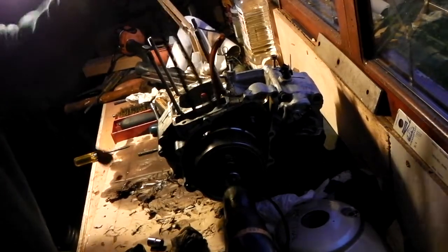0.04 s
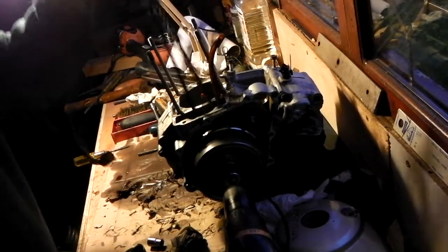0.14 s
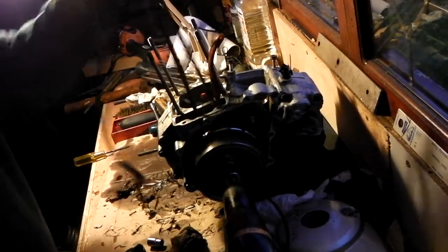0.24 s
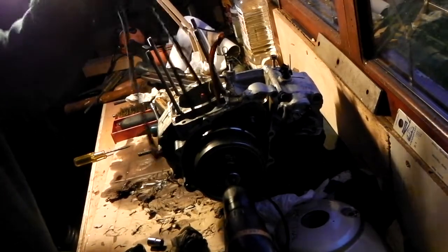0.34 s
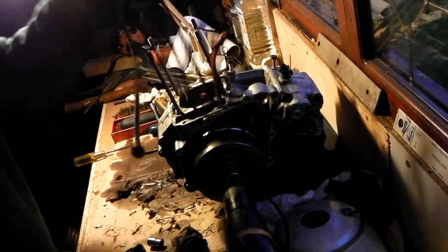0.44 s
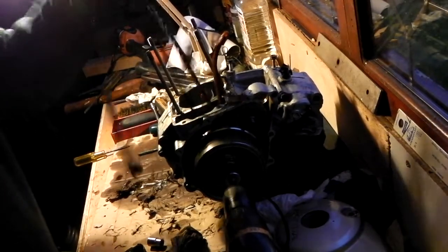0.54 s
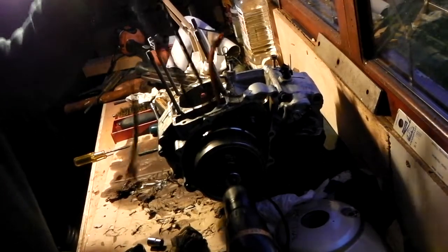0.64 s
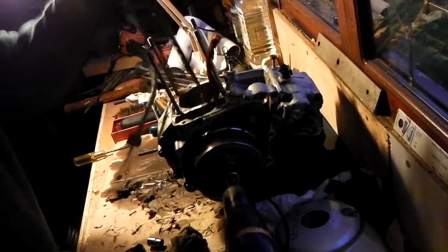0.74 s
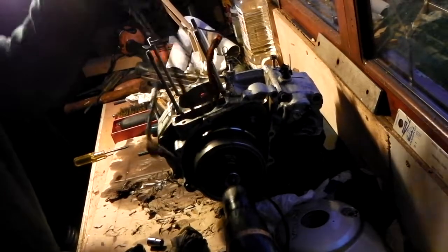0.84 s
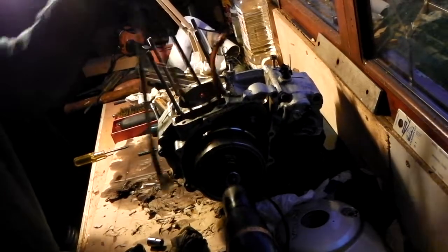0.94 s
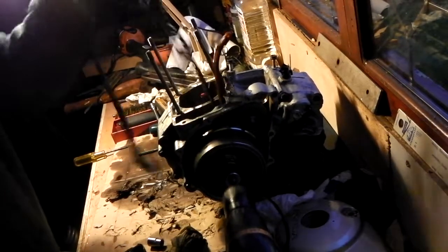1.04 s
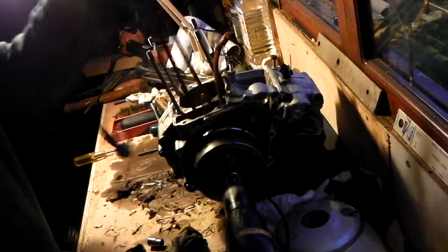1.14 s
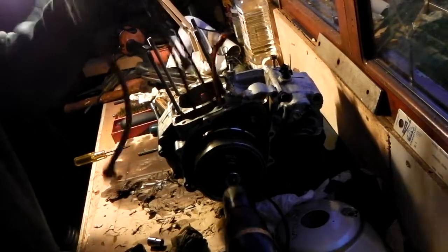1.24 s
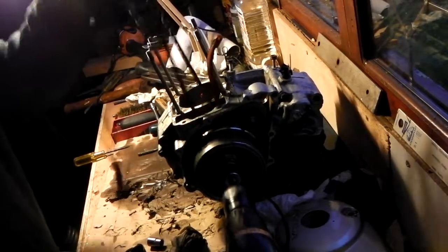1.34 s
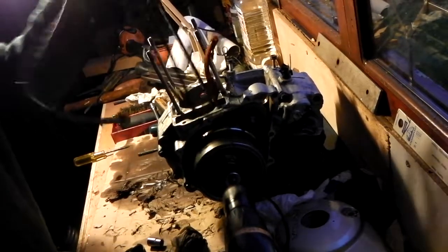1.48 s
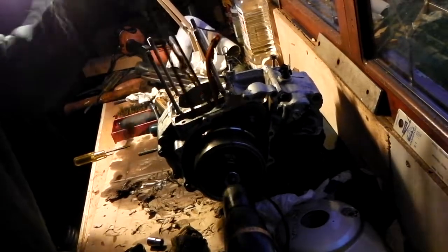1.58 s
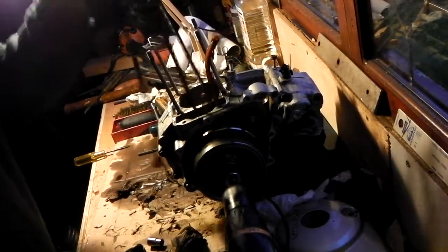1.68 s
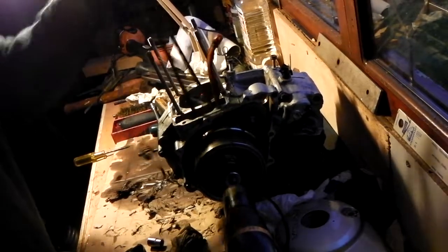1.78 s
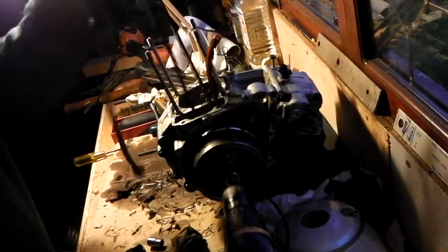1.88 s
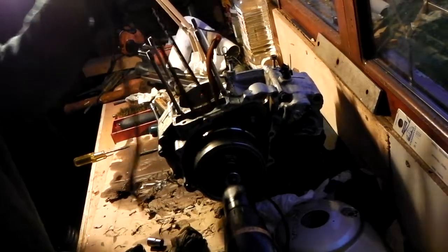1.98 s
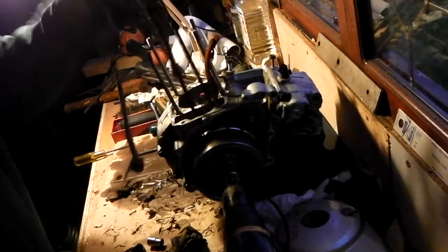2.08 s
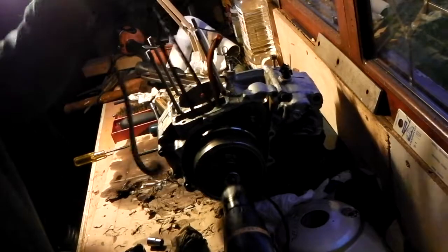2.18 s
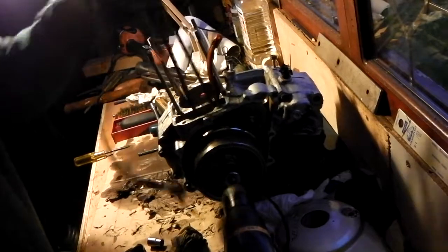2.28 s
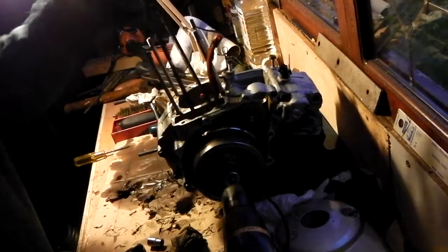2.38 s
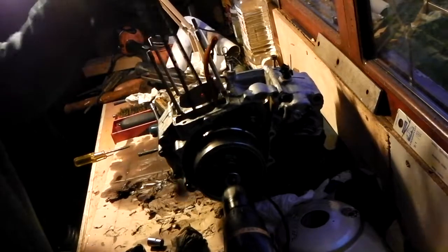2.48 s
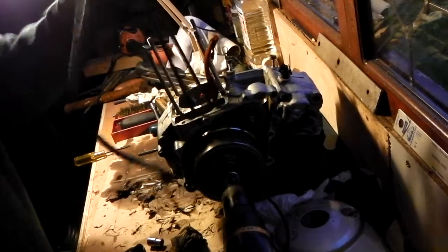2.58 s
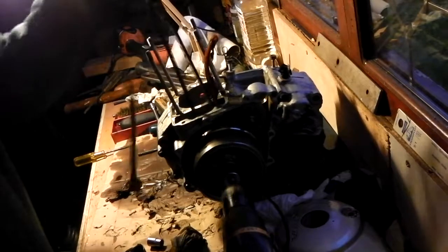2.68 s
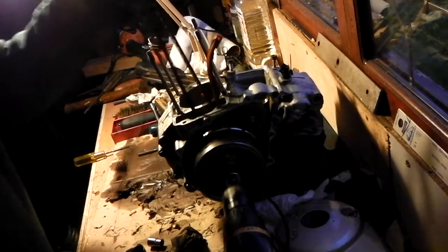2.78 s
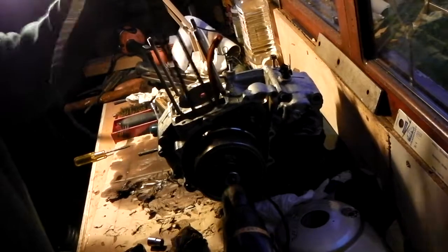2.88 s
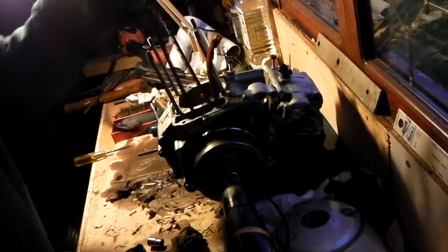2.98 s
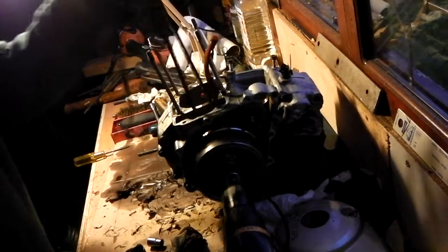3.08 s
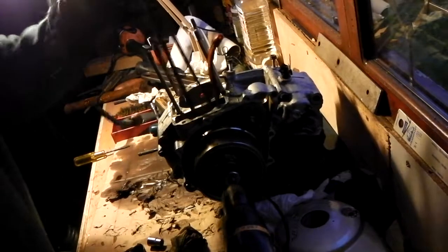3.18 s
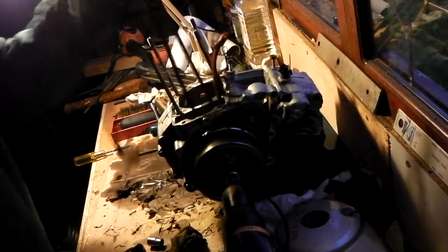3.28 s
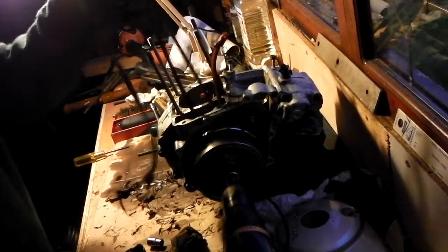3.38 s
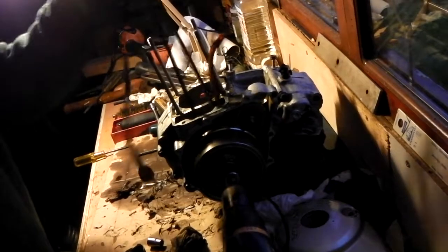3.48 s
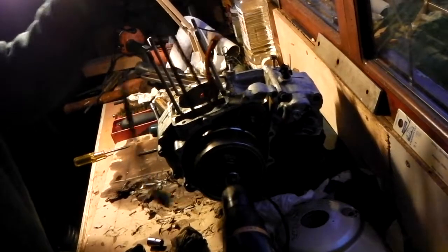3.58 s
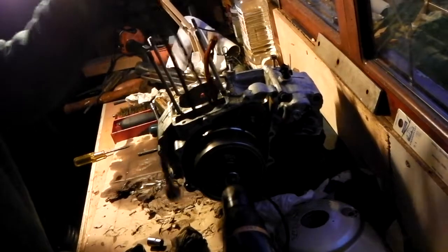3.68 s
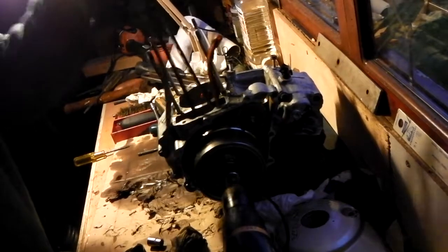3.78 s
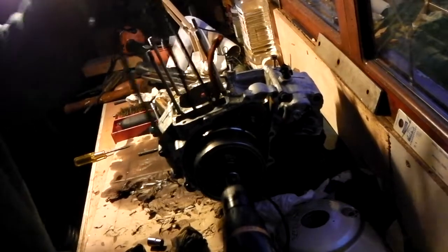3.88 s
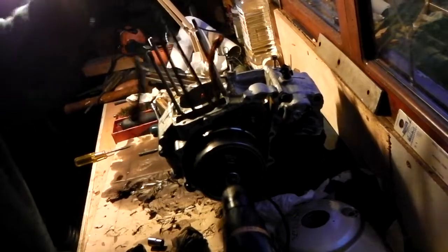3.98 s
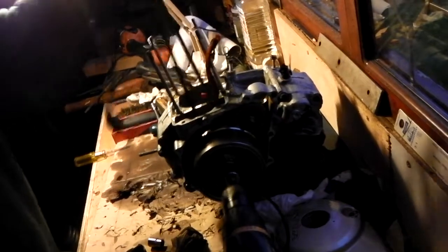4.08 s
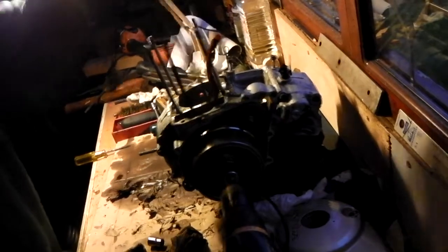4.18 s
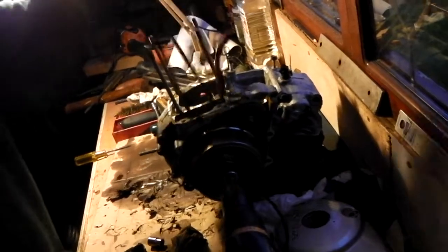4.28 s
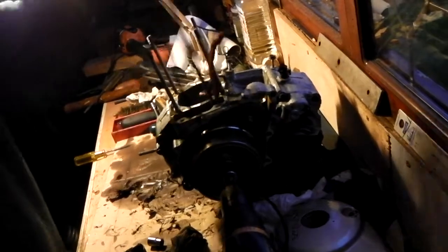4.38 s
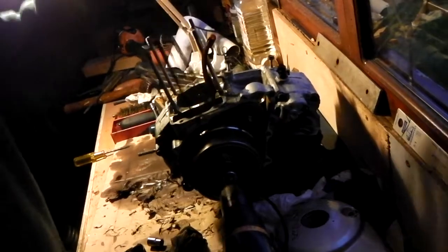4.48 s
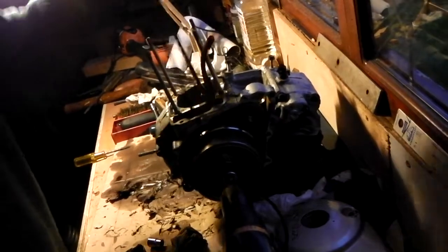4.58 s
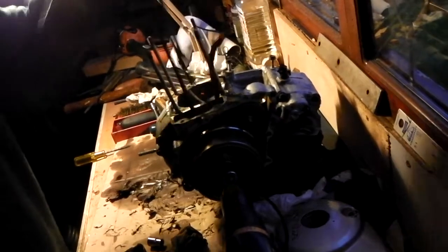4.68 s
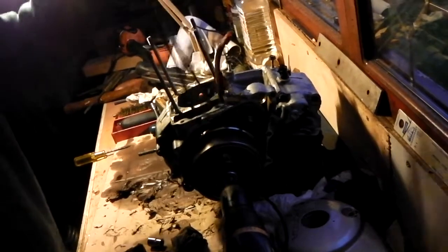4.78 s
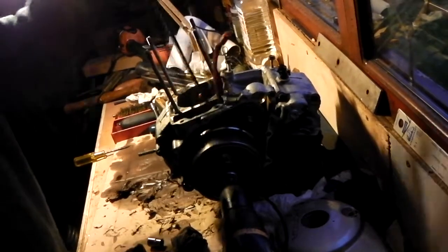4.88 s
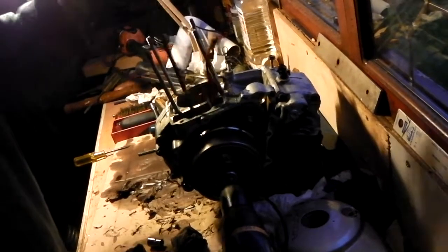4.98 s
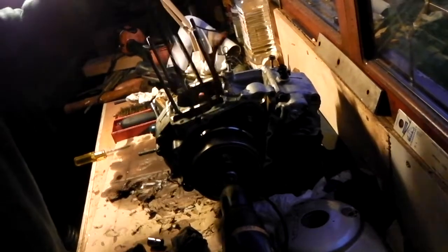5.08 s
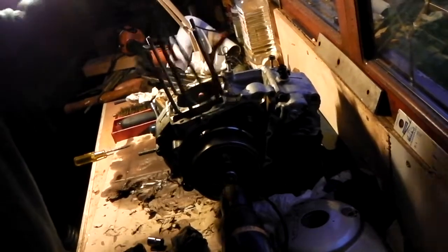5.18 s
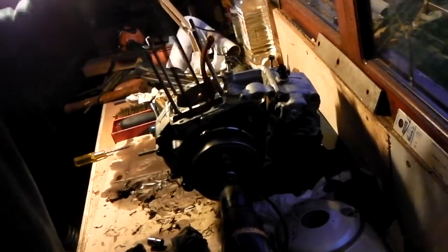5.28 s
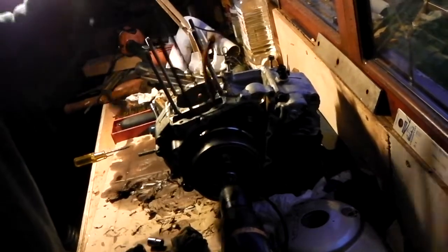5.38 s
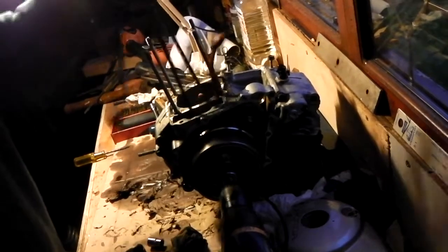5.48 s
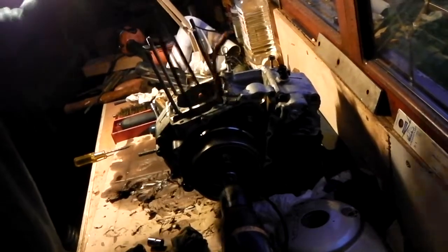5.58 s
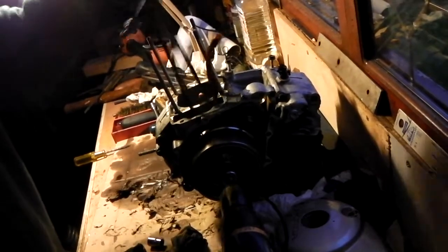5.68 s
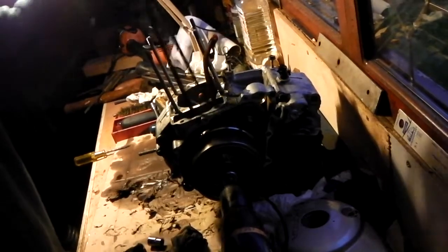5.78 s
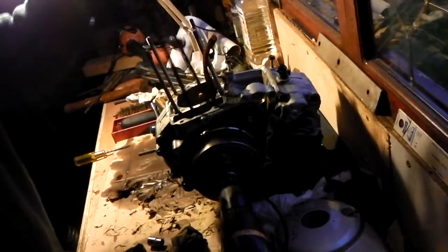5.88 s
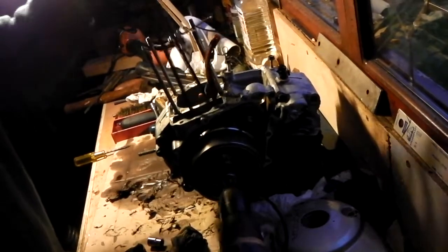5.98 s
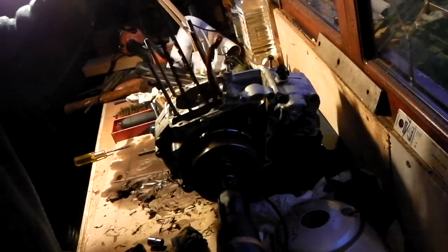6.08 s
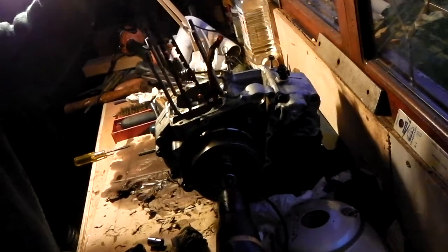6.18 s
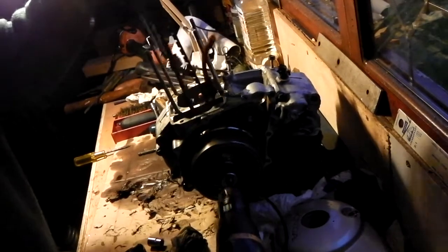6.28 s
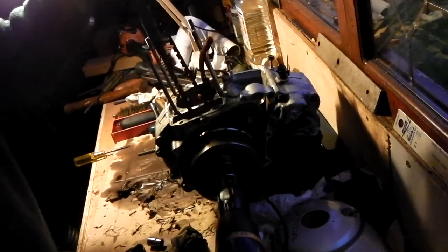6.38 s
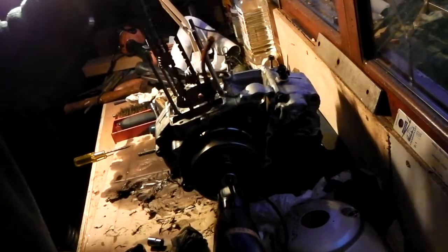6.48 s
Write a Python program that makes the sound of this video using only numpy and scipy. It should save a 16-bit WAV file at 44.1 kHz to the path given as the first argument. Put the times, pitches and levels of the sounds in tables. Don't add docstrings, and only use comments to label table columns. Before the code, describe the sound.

Loud, dense mechanical clatter caught by a close small stereo camera microphone: sharp steel clanks, a buzzing metallic rattle and a rough, pulsing gear whine. The bench rocks dully underneath. The drill strains at first, then runs up in pitch while the rattle thins and the blows come faster. It halts abruptly; the steel rings briefly in the short shed echo, with a few faint settling knocks.

```python
import sys
import numpy as np
from scipy import signal
from scipy.fft import rfft, irfft, next_fast_len
from scipy.io import wavfile
from scipy.ndimage import uniform_filter1d, map_coordinates

SR = 44100
rng = np.random.default_rng(int(sys.argv[2]) if len(sys.argv) > 2 else 0)


def undo_db(level):
    steps = np.asarray(level, float) / 20
    return 10 ** steps


def persist_wave(psi):
    counts = np.round(np.clip(psi, -1, 1) * 32767).astype(np.int16)
    wavfile.write(sys.argv[1], SR, np.atleast_2d(counts).T)


N = 288414
TIME = np.arange(N) / SR
STOP_S = 5.96


def unit(x):
    return x / np.sqrt(np.mean(x ** 2) + 1e-20)


def along(points, hz):
    point_hz, value = np.transpose(points)
    return np.interp(np.log(hz + 1), np.log(point_hz + 1), value)


def curves(rows):
    s, *columns = np.transpose(rows)
    return [np.interp(TIME, s, column) for column in columns]


def wobble(knots_per_s):
    knots = rng.standard_normal((2, int(N * knots_per_s / SR) + 4))
    return np.array([map_coordinates(k, [TIME * knots_per_s]) for k in knots])


def filtered(x, response):
    m = next_fast_len(N + SR)
    return irfft(rfft(x, m) * response(np.fft.rfftfreq(m, 1 / SR)), m)[..., :N]


def resonances(modes, f):
    return sum(undo_db(db) * 1j * f * w / (c * c - f * f + 1j * f * w) for c, w, db in modes)


def coloured(level, spectrum, lumpy_db, lumps_per_s):
    def colour(hz):
        return undo_db(along(spectrum, hz))

    noise = unit(undo_db(lumpy_db * wobble(lumps_per_s)) * rng.standard_normal((2, N)))
    scale = np.std(filtered(noise, colour))
    return filtered(level * noise, colour) / scale


# start_s, peak_db, glancing_db (higher = brighter, thinner)
LABOURING_CLANKS = [(0.0014, -5.5, -4), (0.0897, -7.5, 3), (0.2693, -13, -2), (0.4421, -6, -2.5),
                    (0.6138, -7.5, -11), (0.789, -10, -6), (0.9656, -14, -19), (1.1348, -4.5, 0.5),
                    (1.3082, -7.5, -7), (1.4775, -10.5, -7), (1.6526, -6.5, -3), (1.8178, -10.5, -9),
                    (1.9896, -17.5, 0), (2.1594, -17, -5), (2.3407, -32, -3), (2.5188, -11.5, 6.5),
                    (2.6694, -20, 1), (2.8292, -10.5, -2), (2.9794, -12, 2), (3.1302, -6.5, 4.5)]
# start_s, peak_db, glancing_db
FREE_CLANKS = [(3.2919, -6.5, 0.5), (3.4126, -4.5, 4.5), (3.5247, -5, 7), (3.6277, -5.5, 4.5),
               (3.7342, -6, 6), (3.8372, -5, 5.5), (3.9419, -7.5, 2), (4.0344, -17, -4), (4.123, -4.5, -1),
               (4.2502, -4.5, 1.5), (4.3795, -3.5, 4), (4.5141, -4.5, 3), (4.6471, -6, 3),
               (4.7784, -10, 10.5), (4.8948, -8.5, 0.5), (5.0295, -11, 3), (5.1536, -16, -7),
               (5.2784, -8.5, 11), (5.4002, -9, 11), (5.5169, -8, 2.5), (5.6401, -11, 12.5),
               (5.7588, -12, 14), (5.8729, -11, -0.5), (5.9862, -6, 2)]
LABOURING_T60_S, FREE_T60_S, T60_S_PER_DB = .091, .17, .02
CLANK_LOW_DB, LOW_DB_PER_GLANCE_DB, CLANK_BRIGHT_DB = -21.5, -.53, -20.5


def clanks():
    events = []
    for rows, base_t60_s in ((LABOURING_CLANKS, LABOURING_T60_S), (FREE_CLANKS, FREE_T60_S)):
        for s, db, glance_db in rows:
            low_db = CLANK_LOW_DB + LOW_DB_PER_GLANCE_DB * glance_db
            t60_s = max(base_t60_s + T60_S_PER_DB * (db + 6.5), .05)
            events.append((s, db, low_db, CLANK_BRIGHT_DB + glance_db, t60_s))
    return events


def crank():
    events = clanks()
    return np.interp(TIME, [-.082] + [row[0] for row in events[1:]], np.arange(len(events)))


# start_s, peak_db, low_db, bright_db, t60_s
STRAY_BLOWS = [(0.3644, -9.5, -13, -19, 0.11), (0.6944, -12, -22, -31, 0.059), (2.3978, -12, 0, -31, 0.063),
               (3.3725, -7, -10.5, -20, 0.034), (3.592, -6, -17.5, -27, 0.067),
               (4.0143, -12, -25, -21, 0.072), (5.9137, -9, -17, -11.5, 0.17),
               (5.9444, -14, -7, -16, 0.053), (6.2094, -56, -19, -20, 0.08),
               (6.2894, -44.5, -16, -11, 0.08), (6.44, -45, -15, -24, 0.29)]


def blows(clank_hold_s):
    level, t = np.zeros((3, N + SR)), np.arange(SR // 2) / SR
    t60_scale = np.array([[1.1], [1], [.8]])
    first_contact = np.array([[.6], [.8], [.25]])
    for rows, hold_s in ((clanks(), clank_hold_s), (STRAY_BLOWS, .004)):
        for s, db, low_db, bright_db, t60_s in rows:
            decay = undo_db(-60 * np.maximum(t - hold_s, 0) / t60_scale / t60_s)
            shape = decay * (1 - np.exp(-t / .0001)) * (1 + first_contact * np.exp(-t / .0055))
            part_db = np.array([[low_db - 4], [-9], [bright_db + 4.5]])
            level[:, round(s * SR):][:, :len(t)] += undo_db(db + part_db) * shape
    return level[:, :N]


# time_s, strength_db
RATTLE_STRENGTH = [(0.0, -20), (0.36, -21), (0.8, -17.5), (1.02, -17.5), (1.4, -19), (1.88, -18.5),
                   (2.97, -18), (3.22, -17.5), (3.44, -22), (3.64, -23), (3.84, -22), (4.19, -24.5),
                   (4.73, -28), (4.97, -25.5), (5.17, -24.5), (5.85, -25), (5.9, -32.5)]
# freq_hz, density_db_per_hz
LOW_SPECTRUM = [(270, -51), (340, -10.5), (420, -6), (900, -1), (1400, 1), (1900, -6.5), (2500, -39)]
BODY_SPECTRUM = [(900, -51), (1200, -19.5), (1700, -7.5), (2700, -3.5), (3800, 1.5), (4600, -3), (5800, 1),
                 (6800, -4.5), (7600, -14), (9000, -48)]
BRIGHT_SPECTRUM = [(6500, -16), (7600, 1.5), (9000, 1.5), (10300, -4), (11300, -4), (13000, -6.5),
                   (16000, -7.5)]
# freq_hz, width_hz, level_db
CASE_MODES = [(564, 19, -23), (813.6, 8.8, 2), (1230, 33, -7), (1796, 62, -4.5), (2737, 49, -7.5),
              (3576, 31, -2), (5250, 130, -8), (5780, 19, -4), (6150, 27, -18)]
# freq_hz, width_hz, level_db
STUD_MODES = [(3553, 4, -15.5), (5980, 3.2, -17), (3856, 12, -17), (5220, 7.4, -30.5)]
RATTLE_LOW_DB, RATTLE_BRIGHT_DB, BRIGHT_DB_PER_DB, RATTLE_DIES_DB_PER_S = -13, -18, .5, 86
LULL_FROM_HZ, LULL_PER_HZ = 963, .0027


def engine():
    strength_db, = curves(RATTLE_STRENGTH)
    mesh_hz = curves(DRILL_SPEED)[0]
    stop_db = -RATTLE_DIES_DB_PER_S * np.maximum(TIME - STOP_S, 0)
    body_db = strength_db + stop_db
    low_db = body_db + RATTLE_LOW_DB
    bright_db = RATTLE_BRIGHT_DB + BRIGHT_DB_PER_DB * strength_db + 1.1 * stop_db
    lull = np.clip(LULL_PER_HZ * (mesh_hz - LULL_FROM_HZ), 0, .95)
    airborne = lull * (crank() % 1) ** 8
    rattle = undo_db(np.array([low_db, body_db + .5, bright_db]) + .84 * wobble(14)[0]) * (1 - airborne)
    level = np.sqrt(rattle ** 2 + blows(clank_hold_s=.013) ** 2)
    shake = coloured(level[0], LOW_SPECTRUM, lumpy_db=2.5, lumps_per_s=90)
    shake = shake + coloured(level[1], BODY_SPECTRUM, lumpy_db=1.5, lumps_per_s=300)
    shake = shake + coloured(level[2], BRIGHT_SPECTRUM, lumpy_db=1, lumps_per_s=500)
    return filtered(shake, lambda f: .7 + resonances(CASE_MODES, f) + undo_db(18.5) * resonances(STUD_MODES, f))


def ring(rows, modes, scatter_db):
    out, t = np.zeros((2, N + SR)), np.arange(SR // 3) / SR
    rise = 1 - np.exp(-t / .0025)
    chance = rng.standard_normal((len(rows), len(modes), 2, 2, 1))
    for (s, db, stretch), luck in zip(rows, chance):
        for (hz, level_db, t60_s), (size, shift) in zip(modes, luck):
            decay = undo_db(db + level_db + scatter_db * size - 60 * t / t60_s)
            tone = np.sin(2 * np.pi * hz * stretch * t + 2 * shift)
            out[:, round(s * SR):][:, :len(t)] += decay * tone * rise
    return out[:, :N]


# freq_hz, level_db, t60_s
ROD_MODES = [(3360, -32, 0.053), (3493, -15.5, 0.1), (3690, -12.5, 0.091), (4020, -18, 0.082),
             (5710, -17.5, 0.17), (5860, -19, 0.25)]
# freq_hz, level_db, t60_s
PIN_MODES = [(1219, -1.5, 0.081), (1826, 8.5, 0.074)]
# start_s, peak_db
COVER_BLOWS = [(0.096, -22.5), (0.297, -26), (0.439, -24), (0.8, -24.5), (0.971, -26.5), (1.147, -37),
               (1.488, -22), (1.952, -34.5), (2.304, -36), (2.565, -36), (2.618, -28.5), (2.914, -35),
               (3.132, -39), (3.299, -17.5), (3.424, -22.5), (3.528, -29), (3.738, -25.5), (3.839, -27),
               (3.944, -25), (4.659, -30), (5.921, -29)]
COVER_HZ, COVER_SCATTER_HZ = 819, 6


def steel():
    rod = ring([(s, db, 1) for s, db, *_ in clanks()], ROD_MODES, scatter_db=4)
    pin_blows = [(s, db + low_db, 1) for s, db, low_db, *_ in clanks() if s < STOP_S]
    pin = ring(pin_blows, PIN_MODES, scatter_db=2.5)
    pitch_hz = COVER_HZ + COVER_SCATTER_HZ * rng.standard_normal(len(COVER_BLOWS))
    cover_blows = [(s, db, hz) for (s, db), hz in zip(COVER_BLOWS, pitch_hz)]
    cover = ring(cover_blows, [(.99, 1, .14)], scatter_db=1)
    return rod + pin + cover


# time_s, mesh_hz, swing_per_turn (0-1), second_order_db
DRILL_SPEED = [(0, 856, .07, -48), (.9, 858, .07, -47), (1.65, 912, .045, -38), (2.16, 936, .035, -37),
               (2.67, 957, .04, -35), (2.95, 1005, .035, -35), (3.13, 1095, .03, -29),
               (3.35, 1270, .03, -27), (3.55, 1385, .012, -26), (3.87, 1445, .015, -30),
               (3.93, 1350, .03, -32), (4.1, 1295, .03, -31), (4.17, 1185, .045, -35),
               (4.51, 1125, .055, -38), (4.89, 1179, .02, -36), (5.25, 1190, .03, -34),
               (5.46, 1245, .03, -35), (5.96, 1265, .03, -38)]
# mesh_multiple, level_db (re the weaker of 2nd and 3rd order)
WEAK_ORDERS = [(1, -14), (4, -1), (5, -4), (6, 1)]
# mesh_hz, level_db (re 2nd order)
THIRD_ORDER = [(860, 6.5), (915, 4), (1000, 5.5), (1150, -5.5), (1280, -3), (1400, -7)]
# mesh_hz, level_db
GROWL_LEVEL = [(860, -46.5), (960, -44.5), (1030, -38.5), (1110, -61)]
SLOWEST_HZ, LATE_TURN, EARLY_TURN, TURN_PER_HZ = 860, .36, -.24, .0052
FREE_HZ, SKEW_PER_HZ = 1040, .009
PULL_DB_PER_HZ_S = .0035
GEARS_DIE_DB_PER_S = 1100


def whine():
    mesh_hz, swing, second_db = curves(DRILL_SPEED)
    stop_db = -GEARS_DIE_DB_PER_S * np.maximum(TIME - STOP_S, 0)
    second_db = second_db + stop_db
    growl_db = along(GROWL_LEVEL, mesh_hz) + stop_db
    gain_hz_per_s = uniform_filter1d(np.gradient(mesh_hz) * SR, size=SR // 10)
    pull_db = PULL_DB_PER_HZ_S * np.clip(gain_hz_per_s, 0, None)
    third_db = second_db + along(THIRD_ORDER, mesh_hz) + pull_db

    fastest_turn = np.clip(LATE_TURN - TURN_PER_HZ * (mesh_hz - SLOWEST_HZ), EARLY_TURN, LATE_TURN)
    u = 2 * np.pi * (crank() - fastest_turn)
    skew = np.clip(SKEW_PER_HZ * (FREE_HZ - mesh_hz), -.4, .33)
    speed_hz = mesh_hz * (1 + swing * (np.cos(u) - skew * np.sin(2 * u)) + .003 * wobble(25)[0])
    phase = 2 * np.pi * np.cumsum(speed_hz) / SR
    load_db = 2300 * swing ** 2 * np.cos(u + np.clip(-3 * fastest_turn, 0, .8))

    orders = [(2, second_db + load_db), (3, third_db + 3 + load_db), (.545, growl_db)]
    orders += [(k, np.minimum(second_db, third_db) + db + load_db) for k, db in WEAK_ORDERS]
    tones = np.zeros((2, N))
    for k, db in orders:
        rough_db = 1.2 * wobble(25)[0] + 2.8 * wobble(110)[0] + 1.5 * wobble(40)
        tones += undo_db(db + 3 + rough_db) * np.sin(k * phase + .6 * wobble(60))

    def case(f):
        return (.85 + .9 * np.abs(resonances(CASE_MODES, f))) / (1 + (f / 6400) ** 12)

    return filtered(tones * [[1], [.6]], case)


# start_s, peak_db, board_knock_db
BENCH_THUMPS = [(0.042, -29, -14), (0.235, -32, 0), (0.363, -40, 8), (0.403, -31, -18.5),
                (0.593, -30, -0.5), (0.748, -26, -8), (0.95, -28.5, -11), (1.069, -34.5, 1),
                (1.135, -24.5, -19), (1.433, -40, 1), (1.552, -36.5, 7), (1.687, -33, -4),
                (2.384, -38, 1.5), (2.855, -37, 7), (3.33, -32, -15), (3.414, -31.5, -24), (3.501, -33, -7),
                (3.735, -46, -11.5), (3.838, -33, -11), (3.94, -35, -6), (4.175, -43, -7), (4.298, -43, -6),
                (4.547, -33, -15.5), (4.675, -39, -7), (4.893, -30.5, -13), (5.061, -36.5, 6.5),
                (5.183, -29.5, 6.5), (5.309, -38, -15), (5.551, -21, -5.5), (5.671, -29, 4)]
# time_s, level_db
RUMBLE_LEVEL = [
    (0.0, -41),
    (0.05, -52),
    (4.7, -50.5),
    (5.1, -47.5),
    (5.85, -49.5),
    (6.03, -42.5),
    (6.38, -66),
]
# freq_hz, density_db_per_hz
BENCH_SPECTRUM = [(20, -47.5), (40, -12), (70, -1.5), (120, 1.5), (180, -5), (240, -9), (300, -25.5),
                  (400, -48)]
BENCH_HZ, BENCH_SCATTER_HZ = 124, 9
ROCKING_DB = 5.5


def bench():
    push, knock = np.zeros((2, N + SR))
    t = np.arange(SR // 5) / SR
    push_shape = (1 - np.exp(-(t / .0059) ** 2)) * undo_db(-60 * t / .076)
    knock_rise = 1 - np.exp(-t / .015)
    pitches_hz = BENCH_HZ + BENCH_SCATTER_HZ * rng.standard_normal((len(BENCH_THUMPS), 1))
    for (s, db, knock_db), hz in zip(BENCH_THUMPS, pitches_hz):
        cycles = hz * (.8 * t + .007 * (1 - np.exp(-t / .015)))
        push[round(s * SR):][:len(t)] += undo_db(db + 5.5) * push_shape * np.sin(2 * np.pi * cycles)
        knock[round(s * SR):][:len(t)] += undo_db(db + knock_db - 5.5 - 60 * t / .26) * knock_rise
    board_spectrum = [(280, -52), (360, -1), (450, -6), (560, -.5), (800, -42)]
    boards = coloured(knock[:N], board_spectrum, lumpy_db=4, lumps_per_s=31)
    rocking = undo_db(curves(RUMBLE_LEVEL)[0] + ROCKING_DB * np.cos(2 * np.pi * (crank() - .45)))
    return push[:N] + boards + coloured(rocking, BENCH_SPECTRUM, lumpy_db=.6, lumps_per_s=16)


# freq_hz, t60_s
SHED_T60 = [(200, 0.34), (2000, 0.56), (6000, 0.13), (15000, 0.25)]


def shed(x):
    hz, t, z = signal.stft(rng.standard_normal((2, SR // 2)), SR, nperseg=256)
    decay = undo_db(-60 * t / along(SHED_T60, hz)[:, None])
    tail = signal.istft(z * decay, SR, nperseg=256)[1]
    delayed = np.pad(x, ((0, 0), (300, 0)))
    return signal.fftconvolve(delayed, tail / np.linalg.norm(tail[0]), axes=1)[:, :N]


# freq_hz, density_db_per_hz
AIR_SPECTRUM = [(150, -32.5), (250, -11), (1000, -8), (3000, -11.5), (5000, -22.5), (8000, -19.5),
                (16000, -26.5)]


def shed_air():
    return coloured(undo_db(-58.5), AIR_SPECTRUM, lumpy_db=1.5, lumps_per_s=23)


# start_s, level_db, pitch_hz, t60_s
SETTLING_TAPS = [
    (5.99, -50, 3553, 2.7),
    (6.348, -51, 1850, 0.67),
    (6.391, -51.5, 1797, 0.61),
    (6.17, -42, 112, 0.26),
    (6.321, -46, 120, .15),
    (6.375, -45, 113, 0.194),
]


def taps():
    out = np.zeros(N)
    for s, db, hz, t60_s in SETTLING_TAPS:
        t = np.maximum(TIME - s, 0)
        out += undo_db(db - 60 * t / t60_s) * np.sin(2 * np.pi * hz * t) * (1 - np.exp(-t / .004))
    return out


# freq_hz, coherence (0-1)
LIKENESS = [(60, 0.96), (300, 0.75), (600, 0.93), (1900, 0.91), (3000, 0.48), (5500, 0.089), (10000, 0.47),
            (15000, 0.31)]
# freq_hz, lag_rad
LEFT_LAG = [(2200, 0.13), (4500, 0.84), (6500, 3.02), (16000, 4.2)]
# freq_hz, level_db
LEFT_TILT = [(60, 4.5), (200, 2.5), (380, 0), (2400, 0), (4400, -2.3), (8100, -1.5), (15000, -.6)]


def ports(pair):
    def mid_side(hz):
        turn = np.arccos(np.clip(along(LIKENESS, hz), 0, 1)) / 2
        return np.cos(turn), np.sin(turn)

    def half(hz):
        return undo_db(along(LEFT_TILT, hz) / 2) * np.exp(-.5j * along(LEFT_LAG, hz) * (hz > 0))

    def to_left(hz):
        mid, side = mid_side(hz)
        return half(hz) * np.array([mid, side])

    def to_right(hz):
        mid, side = mid_side(hz)
        return np.array([mid, -side]) / half(hz)

    return np.array([filtered(pair, to_left).sum(0), filtered(pair, to_right).sum(0)])


def scene():
    machine = engine() + steel() + whine() + taps()
    return ports(machine + undo_db(-10.5) * shed(machine) + bench() + shed_air())


def top_cut(x):
    return signal.sosfilt(signal.butter(12, 16710, fs=SR, output="sos"), x)


NOTCH_HZ, NOTCH_WIDTH_HZ, TOP_HZ = 7880, 480, 15790


def record(dry):
    def microphone(hz):
        notch = (1 - .88 * resonances([(NOTCH_HZ, NOTCH_WIDTH_HZ, 0)], hz)) ** 2
        return notch * np.clip((TOP_HZ - hz) / 120, .01, 1)

    x = filtered(dry, microphone)
    x = x / (1 + np.abs(x / 1.05) ** 6) ** (1 / 6)
    return top_cut(x)


dry = scene()
out = record(dry)
persist_wave(out)
```